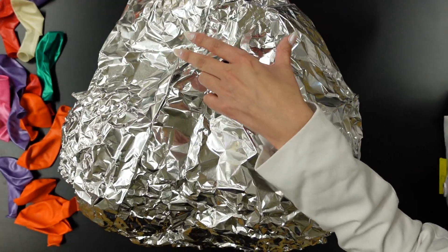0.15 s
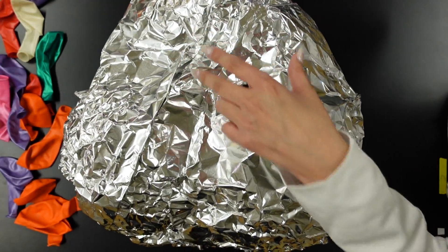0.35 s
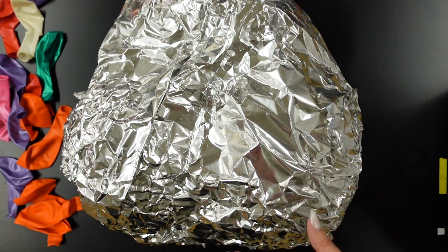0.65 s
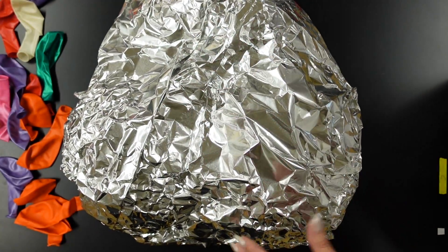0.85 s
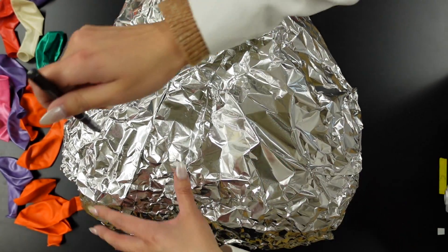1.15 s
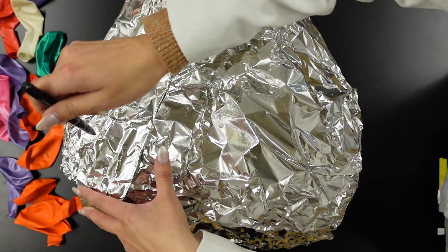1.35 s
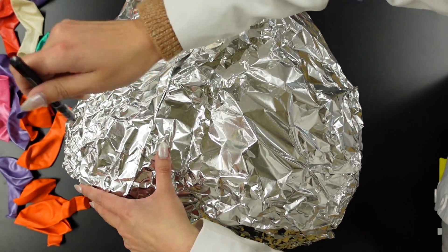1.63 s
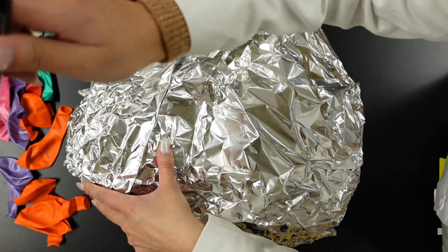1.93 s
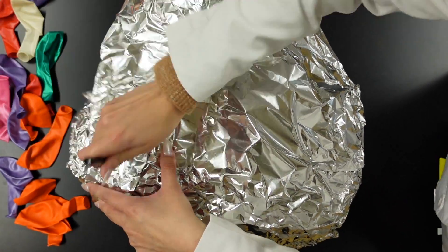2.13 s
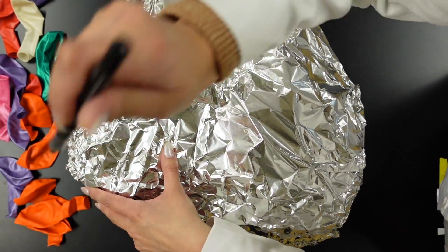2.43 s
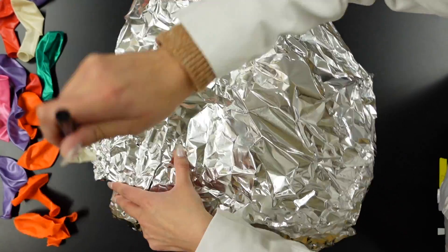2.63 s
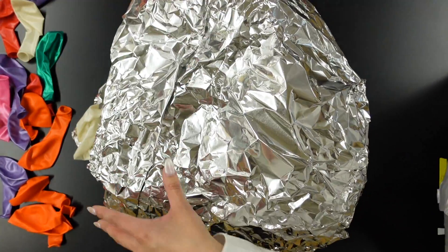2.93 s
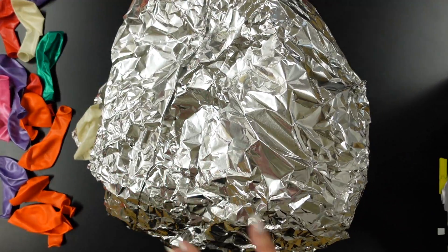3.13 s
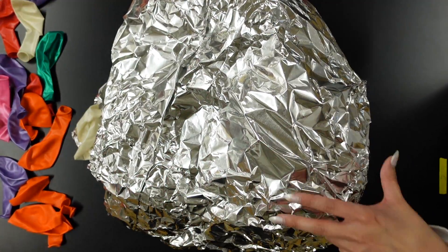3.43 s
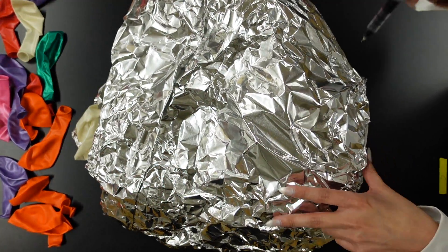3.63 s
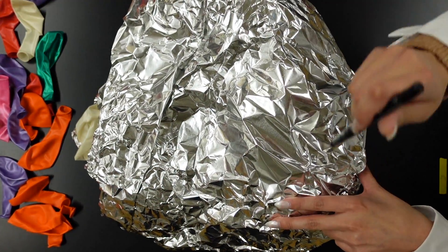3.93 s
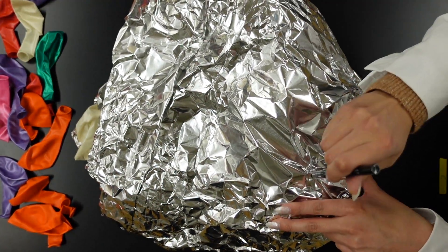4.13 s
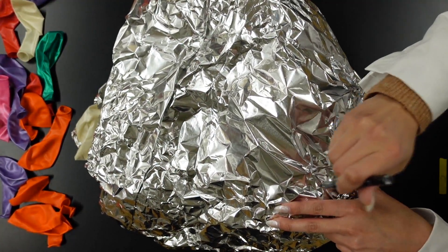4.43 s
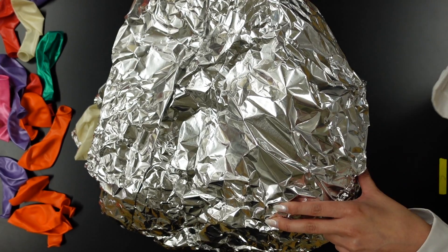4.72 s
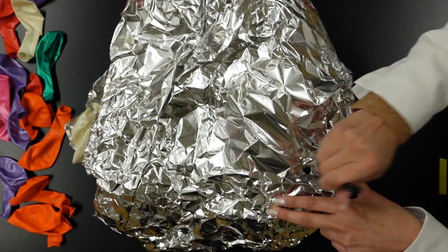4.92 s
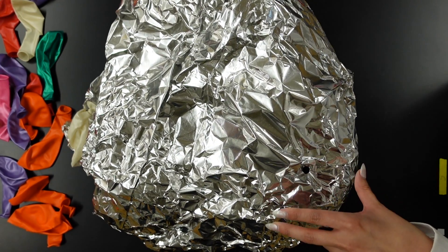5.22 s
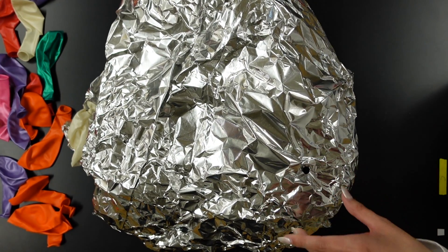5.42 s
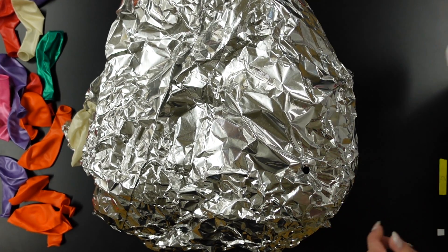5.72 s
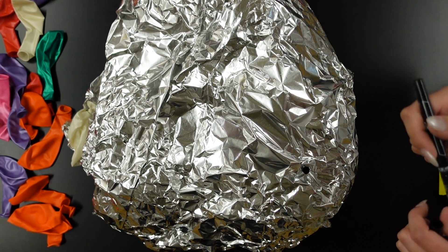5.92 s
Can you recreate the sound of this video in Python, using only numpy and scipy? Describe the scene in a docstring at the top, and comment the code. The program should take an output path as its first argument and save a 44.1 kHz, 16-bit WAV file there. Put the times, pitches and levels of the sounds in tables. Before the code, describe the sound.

Crumpled foil rustles and snaps under a hand, then hidden balloons burst with sharp overloaded bangs, twice, in a small quiet room.

```python
"""Balloons wrapped in crumpled foil burst under a pen on a table indoors, close to one microphone.
Each burst layers noisy tears and thumps of falling pitch, with dying noise tails for the room.
The foil rustles, crumples and snaps: short ringing clicks shaped by strokes, bands and creases.
A low drone, a cloth swish, table rumble and a humming air wash lie below.
The bangs overload the recorder: its limiter ducks, then lets the reverberation swell back."""
import sys
import numpy as np
from scipy import signal
from scipy.fft import rfft, irfft, next_fast_len
from scipy.io import wavfile

SR = 44100
rng = np.random.default_rng(int(sys.argv[2]) if len(sys.argv) > 2 else 0)


def digitize_waveform(pressure):
    """Quantize a signal to 16-bit integers and store it at the path in sys.argv[1].

    Rows of a 2-D input are taken as channels; values are limited to [-1, 1].
    """
    field = np.atleast_2d(pressure).T
    bounded = np.clip(field, -1, 1)
    quanta = np.round(bounded * 32767).astype(np.int16)
    wavfile.write(sys.argv[1], SR, quanta)


N = 267510
TIME = np.arange(N) / SR

# tone colour of the foil: pitch_hz, relative density_db_per_hz
FOIL_COLOUR = [(120, -44.5), (220, -19.5), (400, -3), (550, 0), (850, -4.5), (1050, -6.5), (1300, 2),
               (2500, 1), (4120, -3.5), (5840, -9.5), (7680, -6.5), (9750, -17.5), (13100, -19.5),
               (16000, -25.5)]


def amp(db):
    """Decibels to gain."""
    return 10 ** (np.asarray(db) / 20)


def evened(x):
    """Scales to rms 1."""
    return x / np.sqrt(np.mean(x ** 2) + 1e-20)


def read(points, hz):
    """Reads a table on a log-frequency axis."""
    f, value = np.transpose(points)
    return np.interp(np.log(hz + 1), np.log(f + 1), value)


def add(mix, start_s, sound):
    """Mixes a sound in at start_s, which may lie before the scene begins."""
    at = round(start_s * SR)
    sound = sound[max(-at, 0):]
    part = mix[max(at, 0):][:len(sound)]
    part += sound[:len(part)]


def coloured(x, spectrum):
    """Filters x by a spectrum table and scales it to rms 1."""
    size = next_fast_len(len(x))
    gain = amp(read(spectrum, np.fft.rfftfreq(size, 1 / SR)))
    return evened(irfft(rfft(x, size) * gain, size)[:len(x)])


def band(x, lo_hz, hi_hz, order=2):
    """Causal band-pass."""
    edges = [lo_hz, min(hi_hz, SR / 2 - 1)]
    return signal.sosfilt(signal.butter(order, edges, "band", fs=SR, output="sos"), x)


def dying(x):
    """Lets every band of x die away at the room's rate."""
    # reverberation: pitch_hz, time to fall 60 dB t60_s
    decay_times = [(60, 0.54), (170, 0.48), (400, 0.45), (1000, 0.36), (3000, 0.41), (8000, 0.38),
                   (16000, 0.37)]
    hz, t, z = signal.stft(x, SR, nperseg=256)
    t60_s = read(decay_times, hz)[:, None]
    faded = z * amp(-60 * t / t60_s)
    return signal.istft(faded, SR, nperseg=256)[1][:len(x)]


def in_room(x, wet_db, early_db):
    """Direct sound, quick reflections from table and foil, and the diffuse tail."""
    t = np.arange(SR) / SR
    tail = dying(rng.standard_normal(SR)) * np.clip(t / 0.0022, 0, 1)
    early = np.zeros(SR)
    early[rng.integers(SR // 1000, SR // 70, 12)] = rng.choice([-1, 1], 12)  # 1 to 14 ms late
    echo = amp(wet_db) * tail / np.linalg.norm(tail) + amp(early_db) * early / np.linalg.norm(early)
    return x + signal.fftconvolve(x, echo)[:N]


def bangs(grains, rattle, sag, rise_s, boom_follow):
    """The rubber tears, the freed air swings with falling pitch as the hole opens; room and foil ring on."""
    # layers of the bangs, tear and thump; neighbouring rows can build one bang: start_s, thump_db,
    # thump middle pitch_hz, length_s, rubber tear_db, room boom_db, room hiss_db;
    # levels ahead of room modes and limiter
    layers = [(-.14, 10, 250, .005, -16, -4.5, -6.5), (2.1706, -5, 1287, 0.0042, -15, -18.5, -15.5),
              (2.1758, 8, 580, 0.0014, -13, -26.5, -16.5), (2.233, -5.5, 494, 0.0026, -30, -49, -26),
              (2.5372, -47, 900, 0.0068, -23, -24.5, -21.5), (2.5623, -10, 700, 0.0023, -13, -16, -16.5),
              (2.565, 12.5, 1552, 0.00085, -3.5, -34, -23), (2.587, 4.5, 510, 0.0028, -10, -9, -12.5),
              (2.603, 23, 264, 0.0016, -4.5, -0.5, 1.5), (4.8826, -14, 950, .004, -9, -14, -12),
              (4.885, 20, 650, 0.00076, 1, -24, -21), (4.8953, 21.5, 757, 0.00095, 13.5, 5, 5.5),
              (4.8983, 25, 335, 0.0024, -8, 3, -5)]
    # the room's answer to the thump: pitch_hz for a 420 Hz thump, relative density_db_per_hz
    boom_colour = [(30, -42.5), (70, -20.5), (110, -27), (160, -9.5), (250, 2), (400, 1), (600, -1),
                   (900, -9), (1500, -16), (4000, -34), (16000, -52)]
    # spectrum of the tear and the room's answer to it: pitch_hz, relative density_db_per_hz
    hiss_colour = [(100, -34), (400, 1), (900, -0.5), (1400, -0.5), (2200, -2.5), (4000, -6.5),
                   (6200, -9.5), (8000, -7.5), (10000, -16.5), (13000, -17.5), (16000, -25)]
    out, t = np.zeros(N), np.arange(SR) / SR
    for start_s, thump_db, hz, length_s, tear_db, boom_db, hiss_db in layers:
        boom, hiss = rng.standard_normal((2, SR))
        hiss = coloured(hiss, hiss_colour)
        # a deeper thump leaves a deeper boom
        boom = coloured(boom, np.multiply(boom_colour, [(hz / 420) ** boom_follow, 1]))
        pitch_hz = hz * (1 - sag + 2 * sag * np.exp(-t / length_s))
        swing = np.sin(2 * np.pi * np.cumsum(pitch_hz) / SR)
        thump = amp(thump_db) * swing * (1 - np.exp(-t / rise_s))
        tear = amp(tear_db) * hiss[::-1]  # reversed, so it does not match the tail
        direct = (thump + tear) * np.exp(-(t / length_s) ** 2)
        # the blast sets the foil rattling
        shaken = evened(hiss + rattle * grains[rng.integers(N - SR):][:SR])
        tail = dying(amp(boom_db) * boom + amp(hiss_db) * shaken)
        add(out, start_s, direct + tail * np.clip(t / 0.006, 0, 1))
    return out


def snaps(ring_s, click_s, shiver_s, shiver, width, overtone, overtone_db):
    """A large crease flips with a broad click and a short two-note ring; the sheet around it shivers on."""
    # a crease snaps over: start_s, ring level_db, ring pitch_hz, click_db relative to the ring;
    # the level is the lower note's peak ahead of the room
    creases = [(.008, -27, 425, -7), (0.413, -19.5, 3850, -9), (.476, -28.5, 3330, 3.5),
               (0.648, -33.5, 3380, 0), (1.418, -31, 1590, 13.5), (1.4592, -31.5, 2290, 9.5),
               (1.4727, -9.5, 7460, -26), (1.473, -32, 13400, -3), (1.5036, -24.5, 1780, 6.5),
               (1.5865, -24.5, 2030, 14), (1.61, -35, 3460, 13), (1.6172, -8, 4420, -8),
               (1.6699, -25.5, 1670, 11), (1.6838, -12.5, 7700, -1.5), (1.894, -15.5, 3800, 2.5),
               (1.94, -40, 7420, 15), (1.986, -29.5, 2260, 2), (2.1373, -16, 3900, -17),
               (2.243, -14, 9000, -10), (2.891, -28, 8800, 3), (3.144, -48, 1370, -4),
               (3.5773, -16, 3100, 5), (3.6499, -16.5, 1450, 3.5), (3.702, -15, 3020, -4),
               (3.7959, -26.5, 2200, 11), (3.828, -19.5, 3500, -16), (3.9923, -18.5, 5200, -2.5),
               (4.153, -40.5, 5060, 8), (4.391, -41, 5170, 2.5), (4.635, -33.5, 3750, -3),
               (4.808, -30.5, 4250, 2), (5.349, -34, 1800, -10), (5.395, -23.5, 2300, -15)]
    out, t = np.zeros(N), np.arange(SR // 12) / SR
    shivering = shiver * np.exp(-t / shiver_s)
    for start_s, level_db, hz, click_db in creases:
        strike, click = rng.standard_normal((2, len(t)))
        strike = strike * (np.exp(-t / ring_s) + shivering)
        low, high = (band(strike, f / (1 + width), f * (1 + width)) for f in (hz, hz * overtone))
        ring = low / abs(low).max() + amp(overtone_db) * high / abs(high).max()
        click = coloured(click, FOIL_COLOUR) * (np.exp(-t / click_s) + shivering)
        click = band(click, 380, 20000)  # the click carries no bass
        add(out, start_s, amp(level_db) * (ring + amp(click_db) * click / abs(click).max()))
    return in_room(out, wet_db=-19.0, early_db=-14.5)


def crackle(per_s, spread_db, cycles, count=28):
    """Countless small facets buckle, each ringing for a few cycles at one of many pitches."""
    out, clicks_per_pitch = np.zeros(N), int(N * per_s / count / SR)
    for hz in np.geomspace(350, 15000, count):
        when, size, sign = rng.random((clicks_per_pitch, 3)).T
        strength = amp(spread_db * np.minimum(-np.log(size), 3.5))  # many faint, few strong
        clicks = np.bincount((when * N).astype(int), np.sign(sign - .5) * strength, N)
        # two-pole resonator
        pole = np.exp(2j * np.pi * hz / SR - hz / cycles / SR)
        out += signal.lfilter([0, hz * pole.imag], [1, -2 * pole.real, abs(pole) ** 2], clicks + 1e-12)
    return coloured(out, FOIL_COLOUR)


def stroke_envelope(start_s, length_s):
    """A push rises quickly, eases off while it lasts and dies away once it ends."""
    rise_s, sag_db_per_s, release_db_per_s = 0.02, 13, 261
    t = np.maximum(TIME - start_s, 0)
    fall_db = sag_db_per_s * t + release_db_per_s * np.clip(t - length_s, 0, 1)
    return np.minimum(t / rise_s, 1) * amp(-fall_db)


def rustle(grains):
    """Crackle follows the hand: hollow when the balloons are pressed, fine when the foil is brushed."""
    # one push of hand or pen on the foil, or one sag of the loose sheet: start_s, length_s,
    # level_db, hollow body_db and fine crinkle_db relative to it; all ahead of the trims below
    strokes = [(-.01, 0.073, -30, -6.5, -6.5), (0.201, 0.032, -51.5, 2.5, 1), (0.243, 0.25, -40, -9, -4),
               (0.618, 0.048, -44, -1.5, -11), (0.744, .08, -61.5, -1, -10.5), (1.375, 0.056, -48.5, -5, 3),
               (1.408, 0.25, -37, -5, -14), (1.474, 0.062, -32.5, -3, -9.5), (1.658, 0.031, -26, -8, -13.5),
               (1.718, 0.035, -40, -1, -16), (1.758, 0.084, -31, -9, -6.5), (1.873, 0.023, -29, -11.5, -23),
               (1.962, 0.09, -39, -7.5, -21), (2.097, 0.069, -44, -4.5, -9.5),
               (2.724, 0.14, -27.5, -3.5, -6.5), (2.998, 0.047, -50, -1.5, -25), (3.133, .07, -64, 4, -9),
               (3.546, 0.063, -27.5, -12, -4), (3.605, 0.36, -30.5, -8.5, -9.5),
               (3.912, 0.038, -34, 0.5, -12), (3.98, .025, -41, -12, -6.5), (4.097, 0.05, -49, -12, -3.5),
               (4.143, 0.1, -42.5, -9.5, -10), (4.34, .04, -53.5, 2, -17), (4.383, 0.045, -52, -6, -9),
               (4.43, 0.035, -41, -10, -9.5), (4.575, 0.036, -48.5, -3.5, -3), (4.67, 0.082, -57.5, 1, -17),
               (4.792, 0.015, -37, -0.5, -10.5), (4.857, 0.028, -43.5, 2, -14),
               (5.122, 0.091, -28.5, -2, -10), (5.3, 0.079, -59.5, 7.5, -17), (5.38, 0.018, -47, -7, -13)]
    bands_hz = [(300, 1087), (1000, 4560), (5000, 29000)]
    body, middle, fine = (evened(band(grains, lo, hi, order=3)) for lo, hi in bands_hz)
    power = np.zeros((3, N))
    for start_s, length_s, level_db, body_db, fine_db in strokes:
        gains = amp([level_db + body_db, level_db, level_db + fine_db])
        power += np.outer(gains, stroke_envelope(start_s, length_s)) ** 2
    out = (np.sqrt(power) * [body, middle, amp(2.0) * fine]).sum(axis=0)
    return in_room(amp(-6.0) * out, wet_db=-11.0, early_db=4.5)


def crumples(grains, width):
    """The foil crumples in short runs of band-passed crackle, each tapered at both ends."""
    # band-passed crackle; rows at nearly the same time are parts of one crumple:
    # start_s, rms level_db ahead of taper and room, length_s, band middle pitch_hz
    runs = [(.005, -33, 0.04, 238), (0.03, -34, 0.051, 1500), (0.024, -32.5, 0.053, 4200),
            (0.124, -50.5, 0.11, 526), (.262, -37.5, 0.033, 4570), (0.34, -41, 0.033, 3560),
            (0.402, -40, 0.094, 3230), (1.413, -44.5, 0.11, 417), (1.755, -35, 0.022, 2140),
            (1.783, -31.5, 0.022, 5900), (1.831, -31, 0.03, 4200), (2.197, -25, 0.075, 1370),
            (2.393, -49, 0.03, 2480), (2.481, -49, 0.039, 2600), (2.611, -12.5, 0.13, 790),
            (2.74, -26, 0.033, 4900), (2.744, -27, 0.038, 1900), (3.004, -47, 0.05, 1510),
            (3.568, -32, 0.04, 2850), (3.619, -37.5, 0.17, 820), (3.768, -32.5, 0.02, 3400),
            (3.823, -38.5, 0.049, 597), (3.919, -30, 0.038, 1500), (4.207, -48, 0.079, 1860),
            (4.801, -39.5, 0.031, 4460), (5.168, -28, 0.036, 1600), (5.224, -28.5, 0.027, 1640),
            (5.255, -34.5, 0.019, 1900), (5.356, -48.5, 0.019, 1860), (5.393, -40.5, 0.036, 2420)]
    out = np.zeros(N)
    for start_s, level_db, length_s, hz in runs:
        run = grains[max(round(start_s * SR), 0):][:round(length_s * SR) + 64]
        run = band(run, hz / (1 + width), hz * (1 + width))
        add(out, start_s, amp(level_db) * evened(run) * signal.windows.tukey(len(run), .4))
    return in_room(out, wet_db=-9.5, early_db=-8.0)


def standing_waves(x):
    """Each room mode lifts or cuts a narrow band; the resonant filters ring briefly."""
    # standing waves between table and walls: pitch_hz, width_hz, lift_db (negative cuts)
    modes = [(207.5, 7.3, -6.5), (259, 12, 1.5), (307.3, 12, 4), (379.3, 41, 3.5), (411, 12, 2.5),
             (478, 15, 5), (547, 19, 4), (557, 24, 3), (663, 12, 2), (747, 10, 1), (796, 19, 1),
             (899, 24, 3.5), (1093, 40, 2), (1243, 20, 5.5), (7240, 84, -14)]
    for hz, width_hz, lift_db in modes:
        x = x + (amp(lift_db) - 1) * signal.lfilter(*signal.iirpeak(hz, hz / width_hz, SR), x)
    return x


def low_drone():
    """A low drone near 67 Hz, a room mode or table thud, swells and fades."""
    # one swell of the drone: start_s, rms level_db, length_s
    swells = [(0.027, -48.5, 0.24), (0.37, -61, 0.13), (2.578, -16, 0.067), (2.687, -56.5, 0.14),
              (5.19, -53, 0.13)]
    drone_hz = 67.1
    out = np.zeros(N)
    for start_s, level_db, length_s in swells:
        t = np.arange(round(length_s * SR)) / SR
        drone = np.sin(2 * np.pi * drone_hz * t) * np.sin(np.pi * t / length_s)
        add(out, start_s, amp(level_db) * evened(drone))
    return out


def sleeve():
    """A soft swish of cloth, coloured noise, as the pen is brought over."""
    # the arm sweeps across: time_s, level_db
    sweep = [(.88, -69), (1.03, -60), (1.18, -62.5), (1.36, -75)]
    # tone colour of the cloth: pitch_hz, relative density_db_per_hz
    cloth_colour = [(300, -20), (1500, 4), (4500, 0), (9000, -7), (16000, -22)]
    s, level_db = np.transpose(sweep)
    swish = coloured(rng.standard_normal(N), cloth_colour) * amp(np.interp(TIME, s, level_db))
    return swish * (TIME > s[0]) * (TIME < s[-1])


def shake():
    """The jolted table rumbles through the microphone stand as very low band-passed noise."""
    # a burst jolts the table: start_s, rumble level_db ahead of rise and fade
    jolts = [(2.17, -36.5), (2.58, -36)]
    rise_s, fade_db_per_s = .05, 28.5
    level = np.zeros(N)
    for start_s, level_db in jolts:
        t = np.maximum(TIME - start_s, 0)
        level = np.maximum(level, np.minimum(t / rise_s, 1) * amp(level_db - fade_db_per_s * t))
    return evened(band(rng.standard_normal(N), 11, 28, order=3)) * level


def still_room():
    """Low wash of ventilation, coloured noise, with a wavering hum: a sine plus narrow-band noise."""
    # tone colour of the still room: pitch_hz, relative density_db_per_hz
    wash_colour = [(12, -29), (20, -10.5), (49, -17.5), (168, -8), (198, -9), (262, -5.5), (367, -10.5),
                   (410, -13.5), (446, -10), (527, -20), (590, -15.5), (825, -15.5), (1150, -15.5),
                   (2140, -28.5), (16000, -46.5)]
    wash_db, hum_hz, hum_db = -54.5, 193.8, -60.5  # rms levels
    wash, hum = rng.standard_normal((2, N))
    waver = evened(band(hum, hum_hz - 9, hum_hz + 9))
    hum = evened(np.sin(2 * np.pi * hum_hz * TIME) + 0.245 * waver)
    return amp(wash_db) * coloured(wash, wash_colour) + amp(hum_db) * hum


def scene():
    """All sources at the one microphone."""
    grains = crackle(per_s=2000, spread_db=3.5, cycles=2.1)
    bursts = bangs(grains, rattle=0.45, sag=0.25, rise_s=0.00056, boom_follow=0.28)
    creases = snaps(ring_s=0.0016, click_s=0.00097, shiver_s=0.012, shiver=0.71,
                    width=0.15, overtone=1.7, overtone_db=-7.0)
    # the crackle is shifted a second so that crumples and rustle use different grains
    foil = rustle(grains) + crumples(np.roll(grains, SR), width=0.34)
    resonant = standing_waves(bursts + foil + creases)
    return (resonant + low_drone() + sleeve() + still_room() + shake())[None]


def limiter(x, threshold_db, recovery_db_per_s, attack_s):
    """Ducks a few milliseconds late and recovers at a steady rate."""
    window = SR // 400  # 2.5 ms power average
    power = signal.lfilter(np.ones(window) / window, 1, x ** 2)
    over_db = np.maximum(10 * np.log10(power + 1e-12) - threshold_db, 0)
    # running maximum on a falling slope
    fall_db = recovery_db_per_s * TIME
    held_db = np.maximum.accumulate(over_db + fall_db) - fall_db
    lag = np.exp(-(np.arange(SR // 50) / SR / attack_s - 1) ** 2 * 4)  # bell centred on attack_s
    return x / amp(signal.oaconvolve(held_db, lag / lag.sum())[:N])


def record(dry):
    """Limiter, hard clipping of the peaks it lets through, then a low-pass band limit."""
    ceiling, edge_hz = .5, 15900
    limited = limiter(dry[0], threshold_db=-13.0, recovery_db_per_s=312, attack_s=.004)
    clipped = np.clip(limited, -ceiling, ceiling)
    lowpass = signal.firwin(255, edge_hz, window=("kaiser", 8), fs=SR)
    return signal.oaconvolve(clipped, lowpass, "same")[None]


dry = scene()
out = record(dry)
digitize_waveform(out)
```